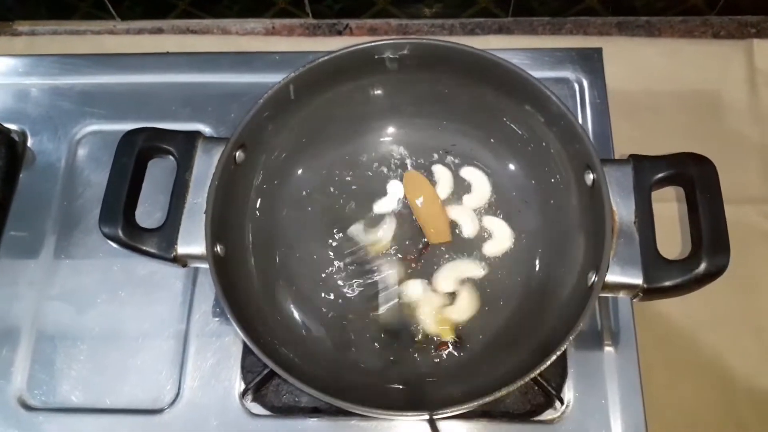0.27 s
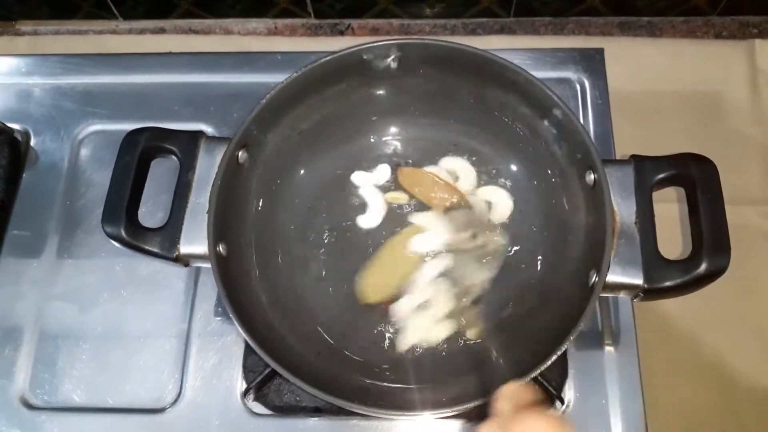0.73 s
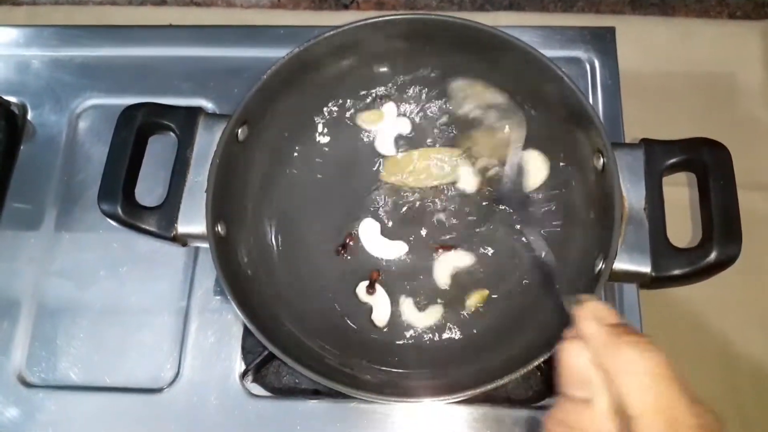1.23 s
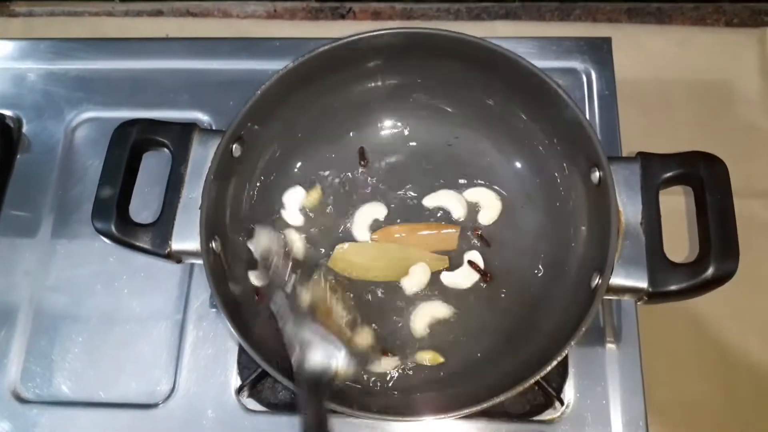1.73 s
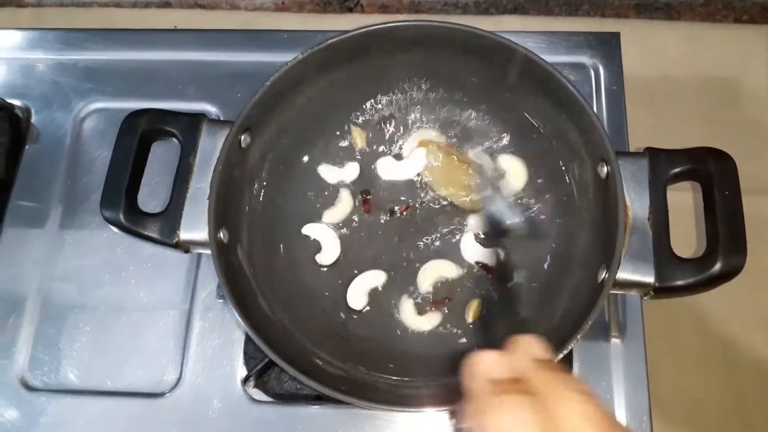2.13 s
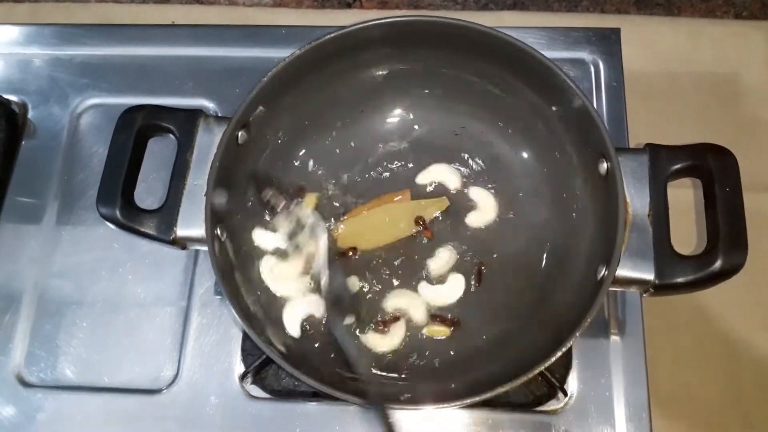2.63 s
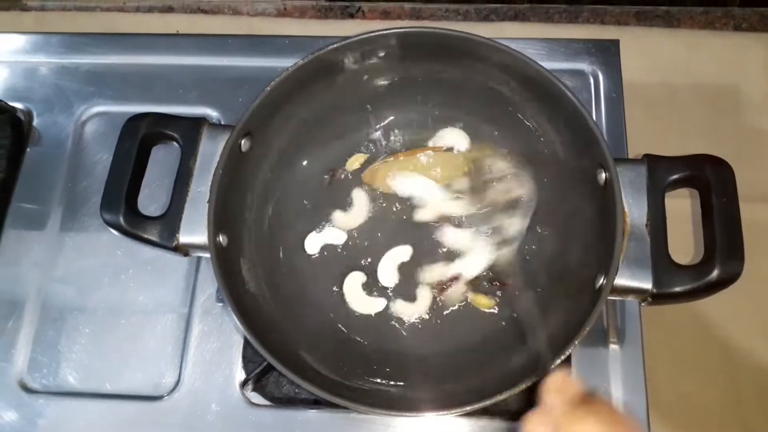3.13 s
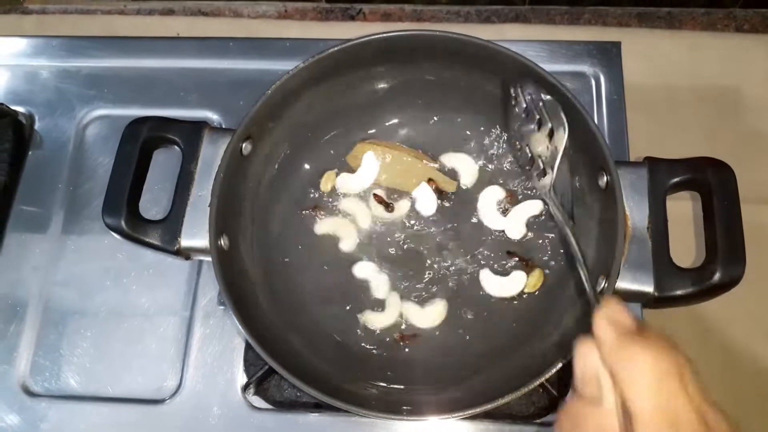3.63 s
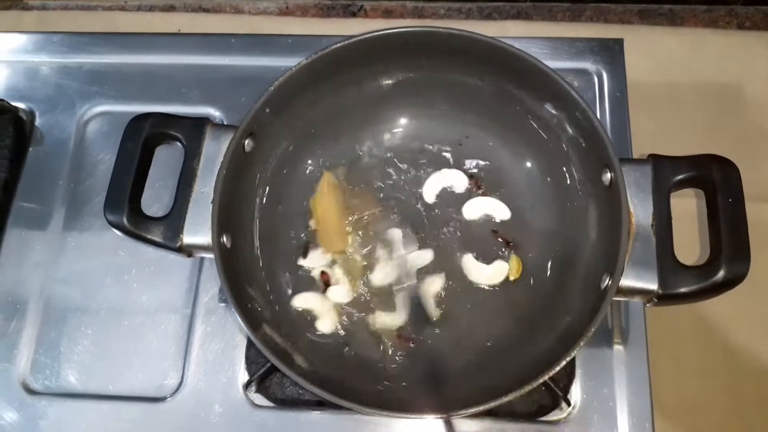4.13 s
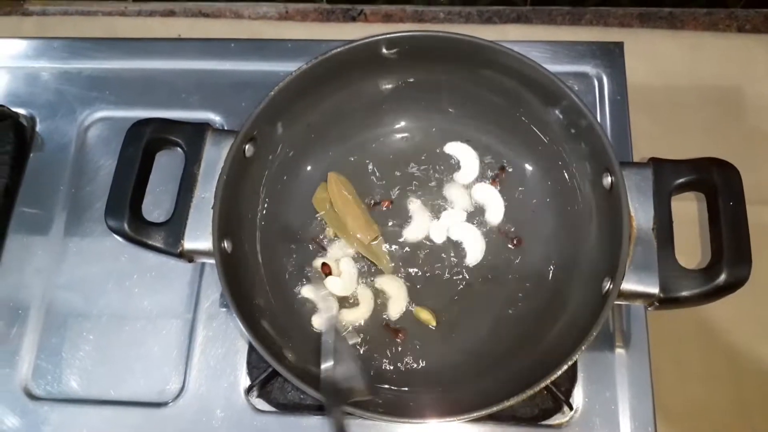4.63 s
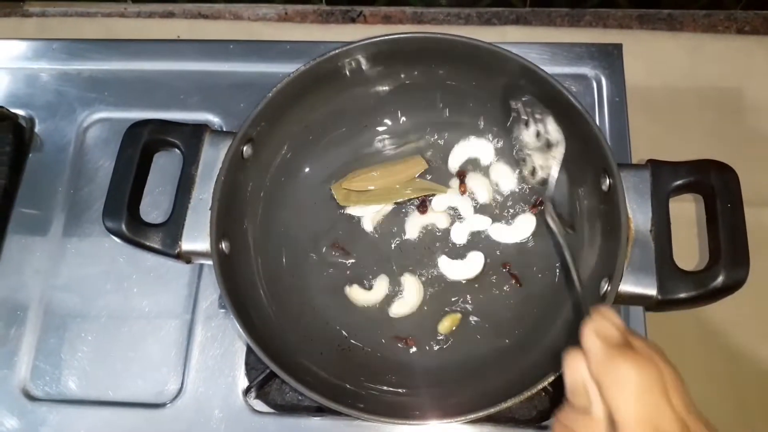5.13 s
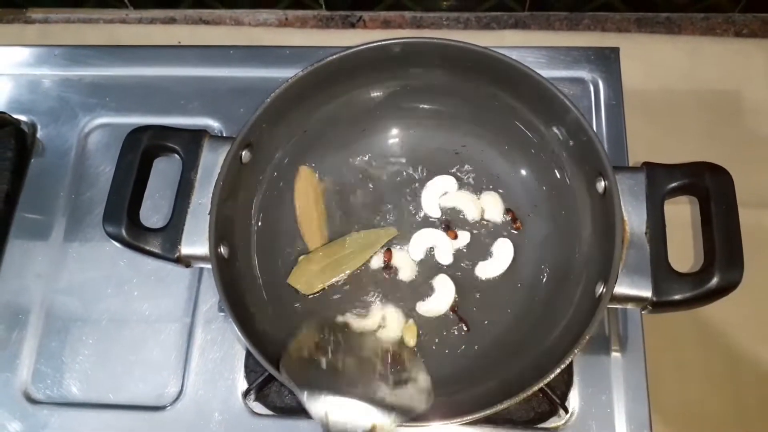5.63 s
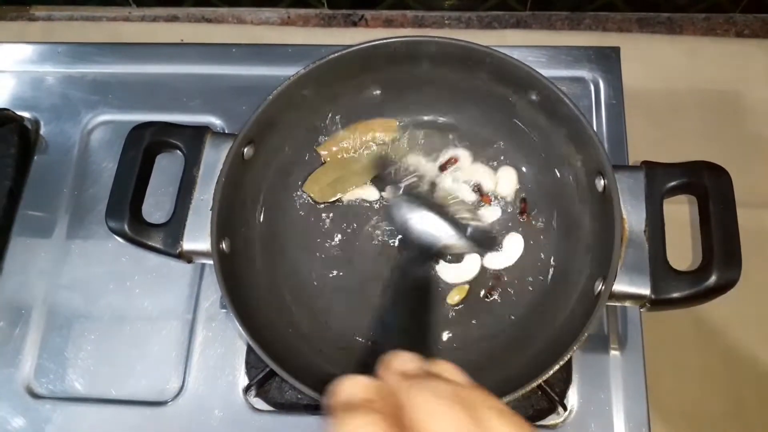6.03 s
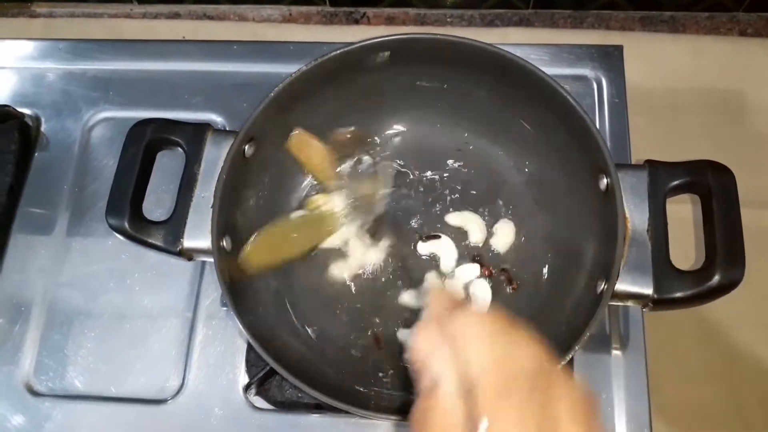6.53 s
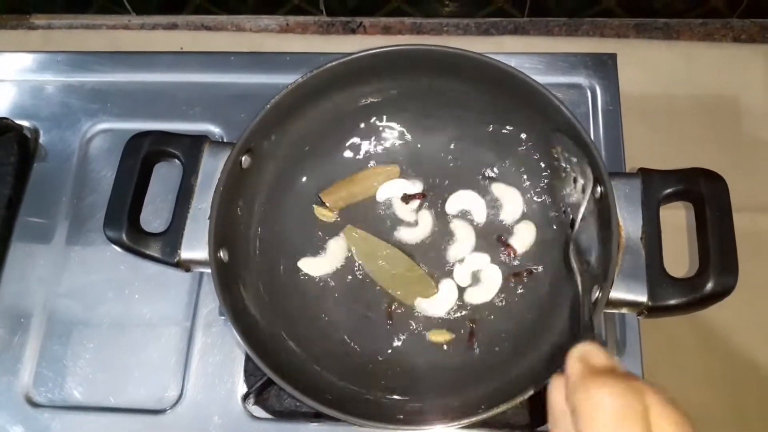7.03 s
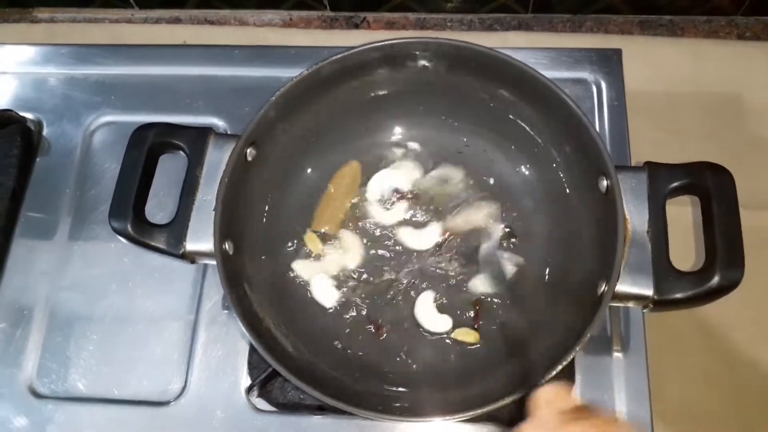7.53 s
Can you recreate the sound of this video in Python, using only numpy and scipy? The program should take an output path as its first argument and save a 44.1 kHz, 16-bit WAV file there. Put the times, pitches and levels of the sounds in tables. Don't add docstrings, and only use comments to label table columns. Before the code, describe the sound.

Nuts and whole spices fry in a little hot oil. Bright fizz swells with each spatula stroke, full of sharp crackles, pitched steam pops and fine spray. The blade knocks the pan every fraction of a second with dull thuds, hollow wall clacks and brief metallic rings, plus short scrapes. Busiest at first, then thinner. Close microphone, short tiled-room echo, sound on the right only; the left holds faint hiss.

```python
import sys
import numpy as np
from scipy import signal
from scipy.fft import rfft, irfft, next_fast_len
from scipy.io import wavfile
from scipy.ndimage import uniform_filter1d

SR = 44100
rng = np.random.default_rng(int(sys.argv[2]) if len(sys.argv) > 2 else 0)


def dump_mix(stems):
    frames = np.atleast_2d(stems).T
    limited = np.clip(frames, -1, 1)
    pcm = np.round(limited * 32767).astype(np.int16)
    wavfile.write(sys.argv[1], SR, pcm)


def undo_db(level):
    steps = np.asarray(level, float) / 20
    return 10 ** steps


N = 342657


def unit(x):
    return x / np.sqrt(np.mean(x ** 2) + 1e-20)


def along(points, hz):
    f, v = np.transpose(points)
    return np.interp(np.log(hz + 1), np.log(f + 1), v)


def filtered(x, response):
    m = next_fast_len(len(x) + 8192)
    return irfft(rfft(x, m) * response(np.fft.rfftfreq(m, 1 / SR)), m)[:len(x)]


def hiss(spectrum, size=N, patchy_db=None):
    x = rng.standard_normal(size + 512)
    if patchy_db:
        z = signal.stft(x, nperseg=256)[2]
        field = uniform_filter1d(rng.standard_normal(z.shape), size=5, axis=0)
        field = uniform_filter1d(field, size=9, axis=1)
        x = signal.istft(z * undo_db(patchy_db * unit(field)), nperseg=256)[1]
    return unit(filtered(x[:size], lambda hz: undo_db(along(spectrum, hz))))


def flutter(depth_db, smooth):
    return undo_db(depth_db * unit(uniform_filter1d(rng.standard_normal(N), size=smooth)))


def bubbles(s, db, hz, cycles, rise, glide=0):
    t = np.arange(SR // 60) / SR
    turns = hz[:, None] * t
    shape = (1 - np.exp(-(turns / rise) ** 2)) * undo_db(-20 * turns / cycles[:, None])
    shape = shape / shape.max(1, keepdims=True)
    wave = undo_db(db)[:, None] * shape * np.sin(2 * np.pi * turns * (1 + glide * turns))
    at = np.round(s * SR).astype(int)[:, None] + np.arange(len(t))
    return np.bincount(at.ravel(), wave.ravel(), N + SR)[:N]


# (delay [s], level [dB])
CUP = [
    (.0007, -4),
    (.0015, -6),
    (.0025, -11),
    (.0044, -17),
]


def cup(x):
    at = np.arange(N)
    place = 1 + .3 * rng.uniform(-1, 1, N // 100)[(at * 60 / SR).astype(int)]
    out = x.copy()
    for k, (s, db) in enumerate(CUP):
        delay = (s * SR * place).astype(int)
        out += (-1) ** k * undo_db(db) * x[np.maximum(at - delay, 0)]
    return out


# (frequency [Hz], level [dB])
DEAD_INPUT = [(20, 7), (300, 4), (1500, 1), (5000, -2), (8500, -11), (13000, -1), (15200, -4), (15600, -40)]


def dead_input():
    return undo_db(-83.5) * hiss(DEAD_INPUT)


# (frequency [Hz], level [dB])
AIR = [(15, -55), (25, -3), (210, -9), (339, 15.5), (430, -72), (600, 20.5), (780, -33), (1320, -120)]


def air():
    return undo_db(-69.5) * hiss(AIR)


# (frequency [Hz], t60 [s])
KITCHEN = [(200, 0.33), (850, 0.29), (1500, 0.4), (5000, 0.28), (12000, 0.19)]


def near_wall(hz):
    delay = np.exp(-2j * np.pi * hz * .0155)
    return undo_db(-8) * delay / (1 + (1.3 * np.log((hz + 1) / 1600)) ** 2)


def kitchen(x):
    out, step = np.zeros(N + 2 * SR), SR // 4
    for start in range(0, N, step):
        hz, t, z = signal.stft(rng.standard_normal(SR // 2), SR, nperseg=256)
        decay = undo_db(-60 * t / along(KITCHEN, hz)[:, None])
        tail = signal.istft(z * decay, SR, nperseg=256)[1]
        answer = signal.fftconvolve(x[start:start + step], tail / np.linalg.norm(tail))
        out[start + round(.007 * SR):][:len(answer)] += answer
    return out[:N] + filtered(x, near_wall)


# (time [s], length [s], drag on the pan [dB], fizz stirred up [dB])
STROKES = [(0.0, 0.018, -53.5, -32.5), (0.36, 0.02, -59, -33), (0.698, 0.16, -82, -34),
           (1.135, 0.14, -54, -38), (1.48, 0.021, -52.5, -38), (1.79, 0.11, -57, -40),
           (2.05, 0.14, -55.5, -41.5), (2.47, 0.02, -50.5, -35.5), (2.755, 0.06, -52.5, -52),
           (2.862, 0.062, -74, -37.5), (3.042, 0.093, -55, -38.5), (3.52, 0.085, -51, -42),
           (3.917, 0.016, -85, -35), (4.116, 0.026, -60, -43), (4.346, 0.045, -59.5, -40.5),
           (4.623, 0.042, -80, -38.5), (4.917, 0.1, -59.5, -45.5), (5.178, 0.18, -79, -36.5),
           (5.498, 0.035, -90, -42), (5.755, 0.1, -51, -53), (6.053, 0.017, -51, -40),
           (6.476, 0.21, -59, -37), (6.976, 0.051, -57.5, -65), (7.073, 0.23, -70, -42),
           (7.47, 0.028, -74, -41.5), (7.71, 0.026, -45.5, -47)]
# (time [s], length [s], spray [dB])
SWEEPS = [
    (0.0, 0.48, -52),
    (0.61, 0.039, -42),
    (1.385, 0.12, -66),
    (2.882, 0.033, -33.5),
    (3.19, 0.039, -54),
    (7.7, .07, -43),
]


def stir_curves():
    t = np.arange(0, N, 64) / SR

    def swells(s, length, db, rise_db_s, fall_db_s, rest_db):
        since = t - s[:, None]
        before, after = np.minimum(since, 0), np.maximum(since - length[:, None], 0)
        each_db = db[:, None] + rise_db_s * before - fall_db_s * after
        return 10 * np.log10((undo_db(each_db) ** 2).sum(0) + undo_db(rest_db) ** 2)

    s, length, drag_db, fizz_db = np.transpose(STROKES)
    press = swells(s, length, drag_db, rise_db_s=160, fall_db_s=99, rest_db=-76)
    froth = swells(s, length, fizz_db, rise_db_s=81, fall_db_s=50, rest_db=-58.5)
    stirred_db = 10 * np.log10(undo_db(froth - 25.5) ** 2 + undo_db(-58.5) ** 2)
    thrown = swells(*np.transpose(SWEEPS), rise_db_s=600, fall_db_s=165, rest_db=stirred_db)
    return [np.interp(np.arange(N) / SR, t, c) for c in (press, froth, thrown)]


# (frequency [Hz], level [dB])
FIZZ = [(290, -138), (500, -11.5), (836, 8), (1090, -4), (1530, 6), (1960, 7), (6060, 6.5), (7690, 9),
        (10000, -11.5), (13000, -58), (22000, -120)]


def fizz(fizz_db):
    luck = rng.random((int(170 * N / SR), 4))
    hz = 2600 * (8500 / 2600) ** np.sqrt(luck[:, 1])
    db = np.minimum(-6 * np.log(1 - luck[:, 2]), 13) + along(FIZZ, hz)
    grains = bubbles(luck[:, 0] * N / SR, db, hz, 1.1 + 2.5 * luck[:, 3] ** 2, rise=1.5)
    grains = filtered(grains, lambda f: 1 / np.sqrt(1 + (f / 8300) ** 16))
    return undo_db(fizz_db) * (undo_db(-6.5) * unit(cup(grains)) + undo_db(-4) * hiss(FIZZ, patchy_db=5.5))


# (frequency [Hz], level [dB])
SPRAY = [(5290, -59), (9000, -42), (10500, -3.5), (12000, 0.5), (15300, -4), (16300, 3), (16600, -77)]


def spray(fizz_db, spray_db):
    mist = unit(flutter(4.1, smooth=40) * hiss(SPRAY, patchy_db=0.5))
    luck = rng.random((int(110 * N / SR), 4))
    db, hz = np.minimum(-5 * np.log(1 - luck[:, 1]), 8), 5000 + 3500 * luck[:, 2]
    ticks = bubbles(luck[:, 0] * N / SR, db, hz, 1.6 + 2.3 * luck[:, 3], rise=0.99)
    ticks = filtered(ticks, lambda f: undo_db(np.maximum(along(FIZZ, f), -12)))
    return undo_db(spray_db + 0.9) * mist + undo_db(fizz_db / 2 - 30.5) * unit(cup(ticks))


# (frequency [Hz], level [dB], t60 [s])
BOWL = [(168, -18, 0.98), (272.2, 4, 0.41), (347.6, 0.5, 0.4)]
WALL = [(740, -5, 0.6), (847, 10.5, 0.098), (950, 1, 0.24), (1215, 2.5, 0.083), (1565, 5, 0.14),
        (1634, -18, 0.083), (2406, -4, 0.37)]
# (frequency [Hz], level [dB])
DRAG = [(60, 0), (120, 6.5), (300, 13.5), (900, -8), (2500, 5), (6000, -34)]


def drag(press_db):
    slips = rng.standard_normal(N) * flutter(2.1, smooth=300)

    def body(f):
        out = undo_db(along(DRAG, f)) + 0j
        for hz, db, t60 in BOWL + WALL[:3]:
            damping = 1j * f * (6 / t60)
            out += undo_db(db) * damping / (hz * hz - f * f + damping)
        return out

    return undo_db(press_db + 1.0) * unit(filtered(slips, body))


def ring(modes, t, scatter_db, wander):
    hz, db, t60 = np.transpose(modes)[:, :, None]
    level = scatter_db * rng.standard_normal((len(modes), 1))
    drift = wander * np.cumsum(rng.standard_normal((len(modes), len(t))), axis=1) / np.sqrt(SR)
    return (undo_db(db + level - 60 * t / t60) * np.sin(2 * np.pi * hz * t + drift)).sum(0)


# (time [s], peak [dB], bowl thud [dB], wall knock
# [dB], blade ring [dB])
KNOCKS = [(0.2189, -17, -20, -13.5, -13), (0.5927, -19.5, -23.5, -25, -4), (1.0305, -18, -22.5, -17, -42),
          (1.3842, -21, -31, -27.5, -11.5), (1.4343, -24, -24.5, -25, -11.5), (1.698, -34, -44, -17.5, -43),
          (1.9593, -21.5, -19.5, -17, -43), (2.35, -24, -18.5, -17, -9.5), (3.0832, -23.5, -25, -25, -8),
          (3.415, -32, -17, -22, -29), (3.4461, -30.5, -17.5, -16, -31), (3.7477, -34.5, -17, -11.5, -19),
          (4.1294, -39.5, -15, -19, -7), (4.377, -25, -23, -23, -17), (4.79, -27, -25.5, -13, -31),
          (4.814, -21.5, -33, -46, -37), (5.1801, -28, -23, -20, -9.5), (5.2843, -24.5, -27, -19.5, -18),
          (5.8833, -16, -23.5, -18.5, -46), (6.3547, -19, -20.5, -22.5, -10),
          (7.051, -23.5, -19.5, -23.5, -7), (7.0872, -31.5, -27, -14, 0), (7.416, -21.5, -19, -11, -40),
          (7.6962, -17.5, -26, -26.5, -12.5)]
# (frequency [Hz], level [dB], t60 [s])
BLADE = [(2625, -11, .25), (3166, -13, .25), (4105, -8, .25), (4800, -12, .18), (5480, -13, .25),
         (5935, -1, .3), (6395, -6, .3), (6950, -8, .25), (7105, -5, .3), (7800, -5.5, .25),
         (9895, -22, .17), (11230, -13, .2), (11710, -14, .25), (14646, -19, .25)]
# (frequency [Hz], level [dB])
RATTLE = [(1180, -44), (2000, -10.5), (2370, -4), (3740, -8.5), (6120, -2), (10000, -18.5), (13000, -75),
          (22000, -120)]
SCUFF = [(60, -34), (150, -33), (400, 5.5), (1200, 12.5), (2200, -13), (3500, -46)]


def knocks():
    out, t = np.zeros(N + SR), np.arange(SR // 4) / SR

    def onset(rise_s):
        return 1 - np.exp(-t / rise_s)

    for s, db, thud_db, wall_db, ring_db in KNOCKS:
        thud = undo_db(thud_db + 2.5) * onset(0.0098) * ring(BOWL, t, scatter_db=1.5, wander=9.9)
        wall = undo_db(wall_db - 1.5) * onset(0.00035) * ring(WALL, t, scatter_db=1.5, wander=22.8)
        blade = undo_db(ring_db + 3.5) * onset(0.0082) * ring(BLADE, t, scatter_db=3, wander=13)
        noise = hiss(RATTLE, size=len(t), patchy_db=2.0)
        noise += undo_db(-3 + 0.36 * ring_db) * hiss(SPRAY, size=len(t))
        noise += undo_db(wall_db + 6.0) * hiss(SCUFF, size=len(t))
        noise *= (undo_db(-9.5 - 60 * t / 0.2) + undo_db(-5.5 - 60 * t / 0.029)) * onset(0.0007)
        blow = (thud + wall + blade + noise) * np.cos(2 * np.pi * t)
        out[round(s * SR):][:len(t)] += undo_db(db) * blow
    return out[:N]


# (time [s],
# frequency [Hz], level [dB], t60 [s])
SINGS = [(1.031, 5916, -25, 0.25), (1.031, 10000, -43, 0.12), (1.034, 4045, -29.5, 0.12),
         (5.886, 7620, -27, .12), (2, 2400, -42, .37), (5.24, 840, -42.5, 0.47), (7.418, 2358, -33, 0.18),
         (4.316, 2800, -33, 0.1), (4.634, 1200, -45, .12), (7.418, 2470, -29, 0.19),
         (7.418, 1540, -46, 0.16), (5.29, 430, -47.5, 0.3), (0.219, 1374, -19.5, 0.031),
         (7.416, 4200, -22, 0.017)]


def sings():
    out, t = np.zeros(N + SR), np.arange(SR // 2) / SR
    for s, hz, db, t60 in SINGS:
        pair = np.sin(2 * np.pi * hz * t) + .4 * np.sin(2 * np.pi * hz * 1.004 * t)
        out[round(s * SR):][:len(t)] += undo_db(db - 60 * t / t60) * (1 - np.exp(-t / 0.00058)) * pair
    return out[:N]


# (time [s], peak [dB], pitch [Hz])
CRACKLES = [(0.0176, -18, 5300), (0.0235, -22, 6850.0), (0.0515, -13, 4820.0), (0.0602, -14, 6590.0),
            (0.1052, -15.5, 5520), (0.1822, -14.5, 5230), (0.2199, -10, 5430), (0.2349, -26, 6070.0),
            (0.4661, -26, 6800.0), (0.5504, -15, 6200.0), (0.7768, -14.1, 6050.0), (0.7988, -12, 5130),
            (0.8424, -16, 4950.0), (0.8855, -13, 5170.0), (0.9837, -20, 5070), (1.1446, -11.5, 6230),
            (1.2497, -17, 6030), (1.3962, -6, 7200), (1.4692, -17, 4960), (1.5259, -14.5, 6170),
            (1.5525, -18, 6220.0), (1.6918, -22, 5900), (1.7008, -17, 6650), (1.8476, -14.5, 5970),
            (1.8541, -21, 7340), (1.9033, -13, 6100), (1.9607, -11.7, 5500), (2.3382, -16, 4930),
            (2.5216, -29, 5380), (2.5316, -18, 6030.0), (2.7592, -13, 6400.0), (2.779, -15, 5030),
            (2.8863, -16, 6930.0), (2.9078, -11, 6900), (2.9474, -16, 7000.0), (3.4509, -15, 6050.0),
            (3.5105, -15, 5440), (3.5627, -20, 5000), (3.7486, -23, 5990), (3.9476, -13, 5430.0),
            (4.0397, -16, 6070), (4.0723, -16, 6500), (4.2116, -17, 6090.0), (4.816, -16, 7640.0),
            (5.0122, -15.5, 5760), (5.0969, -17.5, 6850.0), (5.1727, -22, 4820.0), (5.2207, -15, 6220),
            (5.8401, -20.5, 5400), (5.8573, -21, 7800.0), (6.0901, -13.5, 5900), (6.2336, -15, 5940),
            (7.0536, -27, 6230), (7.3424, -25, 6060), (7.4053, -17, 6200.0), (7.418, -8.5, 5970),
            (7.7054, -12, 5620.0)]
SNAPS = [(0.3339, -19, 4390.0), (0.3671, -15, 4260.0), (0.4134, -22, 3810.0), (0.6276, -19, 3500),
         (0.7405, -21, 3830.0), (0.8929, -17, 4180.0), (0.9366, -16.5, 4330), (1.0383, -9, 4730),
         (1.1136, -15, 4010.0), (1.3495, -20, 4740.0), (1.7743, -17, 3350), (1.9411, -16, 4250),
         (2.1775, -25.5, 3000), (2.2344, -23.0, 4010.0), (2.3531, -15, 4950), (2.4878, -19.9, 4070.0),
         (2.5968, -16, 5020), (2.6521, -29, 4840), (2.6906, -26, 4970), (2.8125, -22, 4860),
         (2.8825, -12, 4220), (2.9209, -27, 3190.0), (1.854, -24, 4000), (1.755, -17, 4300),
         (2.013, -18, 4000), (3.1742, -14, 4130), (3.4173, -19, 4160.0), (3.8613, -17, 4300),
         (3.9096, -24, 5320), (3.9302, -16, 4300), (4.1426, -15, 4400), (4.1994, -15, 4400),
         (4.5521, -24, 3340), (4.5655, -20.5, 3100), (4.7312, -19.5, 3900), (4.826, -17, 2900),
         (5.1611, -16, 4800), (5.286, -14.5, 4230), (5.5724, -19, 3190.0), (5.8845, -5, 4000),
         (5.8903, -13, 3670), (6.0833, -15.5, 4270), (6.5246, -19, 3030), (6.9592, -20, 5100),
         (7.0001, -20.5, 4250), (7.3213, -22.5, 4910)]
# (time [s], peak [dB],
# pitch [Hz])
TAPS = [(0.0993, -18.5, 2160), (0.4717, -16, 1530), (0.6665, -16, 1480), (1.0316, -14, 780),
        (1.2517, -18.5, 1860), (2.7512, -23.5, 2050), (3.0283, -26, 830), (3.4377, -18.5, 2280),
        (4.5655, -16, 1300), (3.9517, -21, 1720), (4.376, -24, 1530), (3.9, -20, 1460), (1.719, -23, 1490),
        (4.6463, -20, 1610), (4.8286, -28, 2500), (5.0625, -25, 1570), (5.4793, -15, 2420),
        (5.4946, -31, 2330), (5.5745, -24, 2220), (6.0827, -16, 1620), (6.0995, -21.5, 1650),
        (6.4977, -14, 1700), (6.5111, -16, 1560), (6.6172, -24.5, 1570), (7.0418, -30, 950),
        (7.3218, -23, 1640)]
# (time [s], peak [dB])
FLICKS = [(0.0802, -30), (0.3561, -23), (1.1826, -27), (1.9939, -37), (2.8579, -25), (2.9008, -20),
          (3.4496, -25), (4.0284, -31), (4.7147, -35), (5.011, -27), (5.2845, -19), (5.471, -32),
          (6.0307, -33), (6.09, -21), (6.264, -30), (6.5844, -28)]


def crackles():
    def burst(rows, gain_db, cycles, beside, beside_db):
        s, db, hz = np.transpose(rows)
        s, db = s - 1.6 / hz - .0003, db + gain_db
        life = np.full(len(s), cycles)
        main = bubbles(s, db, hz, life, rise=0.99)
        return main + bubbles(s, db + beside_db, hz * beside, 0.38 * life, rise=1.0)

    flicks = [(s + .0005, db, 13000) for s, db in FLICKS]
    out = burst(CRACKLES, -2.5, cycles=4.7, beside=0.57, beside_db=-12)
    out += burst(SNAPS, -5.5, cycles=9.2, beside=1.54, beside_db=-4)
    out += burst(TAPS, -8, cycles=4.6, beside=0.66, beside_db=-7)
    return out + burst(flicks, 5, cycles=5.0, beside=0.51, beside_db=-1)


def small_source(hz):
    return (1j * hz / (380 + 1j * hz)) ** 2


# (time [s], peak [dB], pitch [Hz])
PLOPS = [(0.389, -24, 2010), (0.404, -21.5, 2170), (0.466, -24, 1500), (0.549, -22.5, 2170),
         (0.659, -23, 1400), (0.726, -21.5, 1510), (0.777, -22, 1600), (0.842, -24, 1790),
         (1.13, -25, 1730), (1.226, -22, 1660), (1.303, -25, 1520), (1.419, -22.5, 1720),
         (1.699, -30.5, 1180), (2.031, -25.5, 1500), (2.652, -29, 2120), (2.814, -30.5, 2120),
         (3.056, -30, 1570), (3.287, -28, 2120), (3.846, -23.5, 2800), (4.315, -24, 3030),
         (4.565, -21.5, 896), (4.632, -21.5, 1640), (5.136, -31.5, 944), (5.465, -29.5, 2500),
         (6.048, -26, 1690), (6.091, -28.5, 1780), (6.226, -36, 940), (6.585, -35, 1270), (7.199, -31, 955),
         (7.417, -19, 2420)]


def plops():
    rows = [(s - .0011, db + 2.5, hz) for s, db, hz in PLOPS]
    rows += [(s, db + wall_db + 11.5, 847) for s, db, _, wall_db, _ in KNOCKS]
    s, db, hz = np.transpose(rows)
    luck = rng.uniform(-1, 1, (len(s), 2))
    big = bubbles(s, db - 1.5, hz, 5.7 * undo_db(1.5 * luck[:, 0]), rise=.7, glide=.0039)
    deep = hz < 1300
    upper_hz = hz * np.where(deep, 1.55, .58) * undo_db(1.6 * luck[:, 1])
    upper = bubbles(s, db - np.where(deep, 3.5, 11), upper_hz, np.full(len(s), 3.5), rise=0.87)
    return filtered(big + upper, small_source)


# (time [s], peak [dB], pitch [Hz])
POPS = [(0.1508, -14.5, 5730), (0.5311, -19.5, 6200), (0.5685, -15, 6170), (0.6596, -13.5, 7140),
        (0.7673, -14, 6170), (1.245, -17.5, 6940), (1.2968, -19.5, 6200), (1.3202, -23, 6600),
        (1.3826, -11.5, 6800), (1.7702, -16, 6600), (1.903, -18, 6200), (2.0312, -17, 5860),
        (2.349, -17.5, 5800), (2.961, -16.5, 6240), (2.9714, -15.5, 6900), (3.0677, -20.5, 7100),
        (5.9276, -24, 5900), (3.8267, -20, 5860), (4.132, -17, 5060), (4.284, -23, 6100),
        (4.3131, -16, 6260), (4.41, -21.5, 5430), (4.4603, -20.5, 5940), (5.2843, -16, 6050),
        (5.883, -22, 7240), (5.9456, -12.5, 6100), (6.226, -17.5, 6300), (6.771, -22.5, 6350),
        (7.648, -25.5, 7240),
        (0.018, -26, 3050), (0.038, -15.5, 3150), (0.0968, -14.5, 4400), (0.7268, -16.5, 5250),
         (0.756, -22, 3780), (0.805, -16.5, 5070), (0.8741, -20.5, 4150), (1.0032, -18, 4200),
         (1.922, -20, 4940), (2.18, -22, 5240), (2.2433, -22.5, 4430), (2.2862, -15.5, 4500),
         (2.7103, -19.5, 4730), (3.013, -18.5, 5200), (3.493, -20, 5030), (3.539, -24.5, 3780),
         (3.6361, -21, 5400), (4.1886, -22.5, 4600), (4.7172, -23.5, 4200), (4.9003, -16.5, 5190),
         (5.1285, -19, 3600), (5.2175, -23, 3080), (5.5579, -20, 4500), (5.636, -16, 5170),
         (6.0014, -22.5, 2940), (6.444, -15, 5000), (6.514, -16.5, 3080), (6.802, -24.5, 3040),
         (7.2548, -24.5, 3100), (7.5237, -22, 5000)]
# (time [s], peak [dB], pitch [Hz], spit [dB])
SPITS = [(0.129, -19, 6340, -3), (0.389, -16.5, 4300, -20), (0.489, -18, 6000, -7),
         (0.594, -13.5, 6700, -2), (1.2238, -16, 5500, -10.5), (1.5738, -18.5, 6300, -12),
         (1.9613, -19, 5510, -15), (2.48, -20.5, 5550, -9), (2.579, -16, 5300, -9),
         (2.7497, -15.5, 6300, -4), (2.868, -17.5, 7050, -1), (2.8792, -14.5, 6350, -25),
         (3.286, -24.5, 4100, -1), (3.381, -20, 3850, -21), (3.5959, -25, 3180, -27),
         (3.8442, -24.5, 2340, 3), (4.0164, -20, 3170, -16), (4.9939, -23, 4340, -9),
         (5.0616, -11.5, 6720, -9), (5.497, -14.5, 6600, -20), (6.0572, -25, 2950, 3.5),
         (6.0763, -15, 6560, -22), (6.3555, -13, 5970, -9), (6.662, -14, 4780, -20),
         (6.739, -26.5, 5530, -6), (7.041, -23, 6200, -18), (7.069, -12.5, 7200, -11),
         (7.354, -25, 6900, -6), (7.3965, -25, 6400, -10), (7.687, -19, 4930, 0)]


def pops():
    dry = [(*row, -26) for row in POPS]
    wet = [(*row[:3], row[3] + 4.5) for row in SPITS]
    s, db, hz, spit_db = np.transpose(dry + wet)
    s, db, same = s + 0.00055, db + 2, np.ones(len(s))
    luck = rng.uniform(-1, 1, (len(s), 4))
    small = bubbles(s, db - 1.5, hz, np.where(hz < 3300, 6.5, 3.8) * undo_db(2 * luck[:, 0]), rise=1.7)
    second_hz = hz * np.where(hz > 5200, .7, 1.4) * undo_db(luck[:, 1])
    second = bubbles(s, db - 12, second_hz, 4 * undo_db(5 * luck[:, 2]), rise=1.4)
    crack = bubbles(s, 1.5 * db, 4800 * same, .8 * same, rise=.3)
    push = bubbles(s, db - 30, 1400 * same, .9 * same, rise=0.69)
    spit = bubbles(s, db + spit_db - 4, 13500 * undo_db(0.83 * luck[:, 3]), 7 * same, rise=2)
    return small + second + spit + filtered(crack + push, small_source)


def scene():
    top_hz = 15950
    press_db, fizz_db, spray_db = stir_curves()
    bursts = cup(pops() + plops()) + crackles()
    blows = knocks() + sings()
    steady = air() + fizz(fizz_db) + spray(fizz_db, spray_db) + drag(press_db) + blows
    soft_bursts = filtered(bursts, lambda hz: 1 / (1 + (hz / 5000) ** 2))
    steady += kitchen(undo_db(-2.0) * soft_bursts + undo_db(-3.5) * blows)
    steady = filtered(steady, lambda hz: np.clip((top_hz - hz) / 200, 0, 1))
    bursts = filtered(bursts, lambda hz: np.clip((top_hz + 200 - hz) / 400, .35, 1))
    heard = filtered(undo_db(5) * (steady + bursts), lambda hz: hz ** 2 / (hz ** 2 + 75 ** 2))
    return np.array([dead_input(), heard])


def roll_off(x):
    return signal.sosfilt(signal.butter(12, 16970, fs=SR, output="sos"), x)


def record(dry):
    mix = dry / (1 + np.abs(dry / .86) ** 4) ** .25
    return roll_off(mix)


dry = scene()
out = record(dry)
dump_mix(out)
```